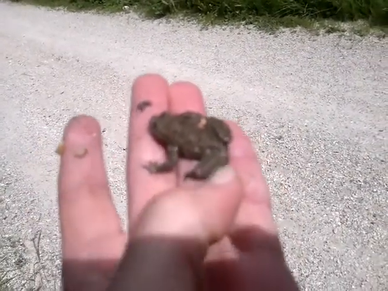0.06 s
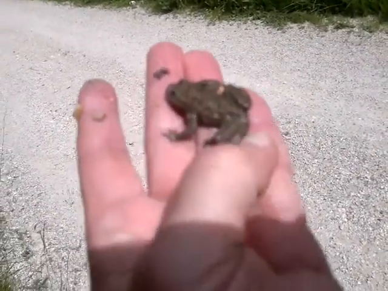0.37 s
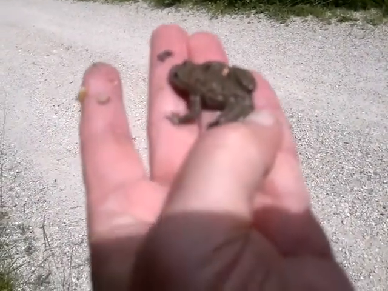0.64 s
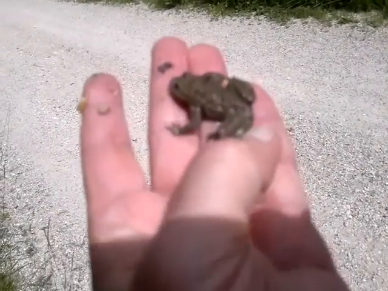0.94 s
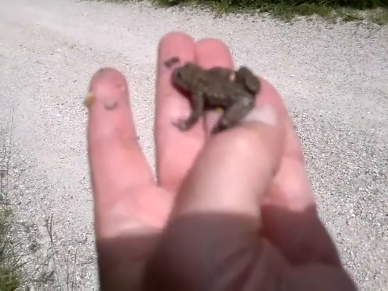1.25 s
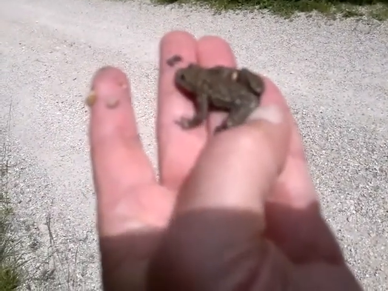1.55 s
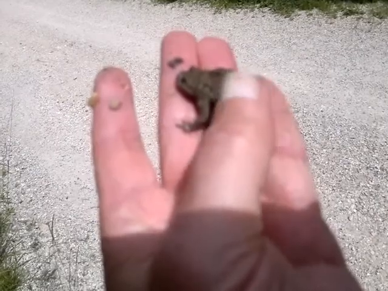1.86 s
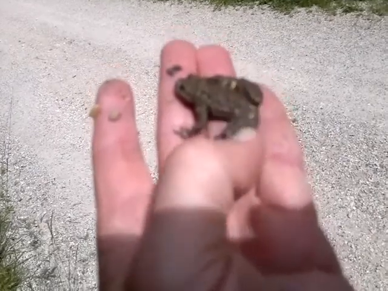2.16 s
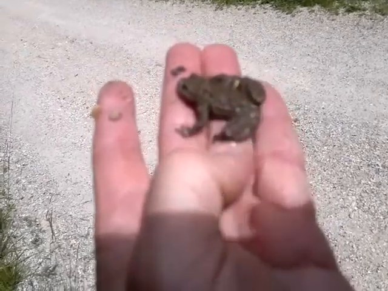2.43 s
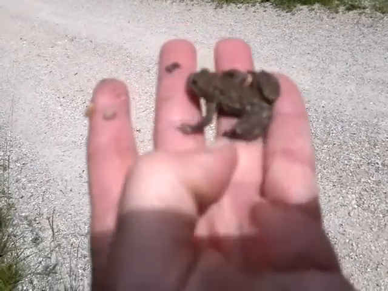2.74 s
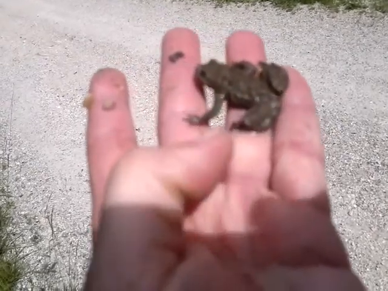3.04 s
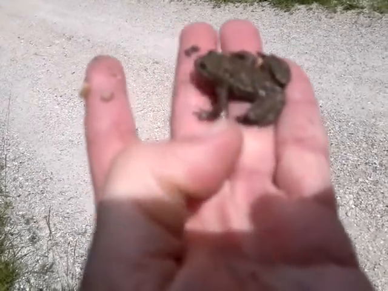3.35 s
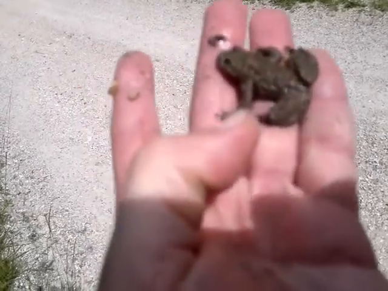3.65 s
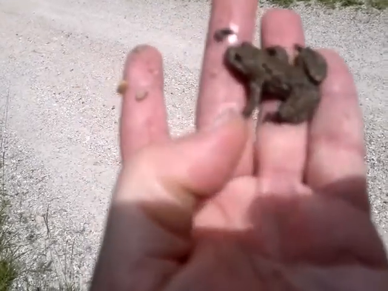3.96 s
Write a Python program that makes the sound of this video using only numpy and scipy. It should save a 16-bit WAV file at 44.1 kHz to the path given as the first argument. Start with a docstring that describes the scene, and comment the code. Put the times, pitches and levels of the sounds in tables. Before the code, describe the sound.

A grasshopper gives about ten faint, high, evenly spaced rasps that grow louder, then a farther one calls more slowly. Insects hiss steadily beside a country road, while wind rumbles and thumps on the microphone, mostly on the right.

```python
"""Grasshoppers by a summer gravel road

A grasshopper in the verge draws leg pegs across its wing: ten evenly spaced, growing calls, each a
short run of strokes. A farther one carries on more slowly over the steady hiss of other insects.
Gusts buffet the microphone, mostly its right port, over a soft far-off rush and a few hand scuffs."""
import sys
import numpy as np
from scipy import signal
from scipy.fft import rfft, irfft
from scipy.io import wavfile
from scipy.ndimage import uniform_filter1d

SR = 44100
rng = np.random.default_rng(int(sys.argv[2]) if len(sys.argv) > 2 else 0)


def wav_out(sig):
    """Save sig, one row per channel (or a flat mono array), as 16-bit PCM at SR to the path in sys.argv[1]."""
    wavfile.write(sys.argv[1], SR, np.round(np.clip(np.atleast_2d(sig).T, -1, 1) * 32767).astype(np.int16))


N = 176400
T = np.arange(N) / SR


def from_db(db):
    """Decibels to gain."""
    return 10 ** (np.asarray(db) / 20)


def unit_power(x):
    """Normalise to an RMS of one."""
    return x / np.sqrt(np.mean(x ** 2) + 1e-20)


def automation(points):
    """A breakpoint curve, read at every sample."""
    return np.interp(T, *np.transpose(points))


def swell(centre_s, width_s):
    """A bell-shaped fade in and out."""
    return np.exp(-.5 * ((T - centre_s) / width_s) ** 2)


def at_bins(points):
    """A curve over log frequency, read at every FFT bin."""
    hz, value = np.transpose(points)
    return np.interp(np.log(np.arange(N // 2 + 1) * SR / N + 1), np.log(hz), value)


def colour(x, eq):
    """Shape a sound with an EQ curve; unit power."""
    return unit_power(irfft(rfft(x) * from_db(at_bins(eq)), N))


def pan(db):
    """Stereo gains, with the left louder than the right by db."""
    return unit_power(from_db(np.array([[db], [-db]]) / 2))


def drift(rate_hz):
    """Smooth random modulation; unit power."""
    pole = np.exp(-2 * np.pi * rate_hz / SR)
    wander = signal.lfilter([1], [1, -2 * pole, pole * pole], rng.standard_normal(N + SR))
    return unit_power(wander[SR:])


def resonate(x, hz, width_hz):
    """One resonance applied twice, for steep skirts; unit power."""
    r = np.exp(-np.pi * width_hz / SR)
    section = [1 - r, 0, r - 1, 1, -2 * r * np.cos(2 * np.pi * hz / SR), r * r]
    return unit_power(signal.sosfilt([section, section], x + 1e-18))


# EQ of the far-off rush: f/Hz, gain/dB
AIR_EQ = [(20, 5.5), (50, 8), (100, 7.5), (150, 0), (280, 0.5), (420, -4), (560, -10), (700, -2.5),
          (850, -5), (1020, -8.5), (1250, -18), (1800, -20), (3000, -25), (5500, -27.5), (9000, -25.5),
          (15000, -39.5)]
# Its left-right likeness: f/Hz, correlation
AIR_CORRELATION = [(60, 0), (150, 0.64), (380, 0.85), (950, 0.56), (2000, 0), (15000, 0.085)]
AIR_PAN_DB = 1


def air():
    """The distant rush of open country: narrow in the mids, wide in the lows and highs."""
    mid, side = rfft(rng.standard_normal((2, N)))
    alike = at_bins(AIR_CORRELATION)
    noise = irfft(np.sqrt(1 + alike) * mid + np.sqrt(1 - alike) * side * [[1], [-1]], N)
    level = from_db(-59 + 1.5 * drift(rate_hz=4.15))
    return colour(noise, AIR_EQ) * level * pan(AIR_PAN_DB)


# Swells of the hum: t/s, level/dB
HUM_LEVEL = [(0, -66), (.6, -70), (.95, -68), (1.15, -64.5), (1.4, -68.5), (1.69, -63.5), (1.8, -70.5),
             (3.2, -68), (3.7, -66), (4, -74.5)]


def hum():
    """A soft, breathy mono hum within the rush, swelling now and then."""
    band = resonate(rng.standard_normal(N), hz=869, width_hz=320)
    return band * from_db(automation(HUM_LEVEL)) * pan(AIR_PAN_DB)


# EQ of the insect hiss: f/Hz, gain/dB
CHORUS_EQ = [(5500, -35), (6600, -13.5), (7200, -4), (7700, -2), (8300, -0.5), (8900, -2), (9600, -7),
             (10400, -5.5), (11300, -14), (13000, -22), (14500, -30), (16000, -46)]
# Fader ride of the insect bed: t/s, level/dB
CHORUS_LEVEL = [(0, -69.5), (.18, -72), (.4, -75.5), (.9, -72), (1.6, -71), (2.1, -69), (2.6, -66.5),
                (3.3, -66), (4, -66)]
# Wing tones that stand out: f/Hz, width/Hz, gain/dB
CHORUS_TONES = [(7730, 560, -13.5), (8050, 230, -12), (9300, 220, -12.5), (9940, 340, -19.5)]
CHORUS_PAN_DB = 7.5


def insect_chorus():
    """Insects along the verge merge into a fluttering high hiss, with a few wavering wing tones."""
    level = from_db(automation(CHORUS_LEVEL) + 1.3 * drift(rate_hz=45))
    bed = from_db(-2.5) * colour(rng.standard_normal((2, N)), CHORUS_EQ)
    for hz, width_hz, db in CHORUS_TONES:
        waver = from_db(db + 2.5 * drift(rate_hz=7.1))
        bed += waver * resonate(rng.standard_normal((2, N)), hz, width_hz)
    return bed * level * pan(CHORUS_PAN_DB)


# Fade-in of the shrill: t/s, level/dB
SHRILL_LEVEL = [(0, -84), (1.9, -85), (2.6, -78.5), (3.3, -73.5), (4, -73)]


def shrill_insect():
    """One more insect joins the chorus with a thin, high buzz."""
    buzz = resonate(rng.standard_normal((2, N)), hz=9700, width_hz=520)
    return buzz * from_db(automation(SHRILL_LEVEL)) * pan(CHORUS_PAN_DB)


# Handling cues: t/s, level/dB, width/s
SCUFFS = [(0.079, -55, 0.0047), (.38, -60, 0.0045), (1.829, -55.5, .024), (2.0, -62, .015),
          (2.728, -50, 0.0037), (3.744, -56, 0.011)]
# EQ of a rub on the casing: f/Hz, gain/dB
SCUFF_EQ = [(100, 5.5), (400, 7.5), (1200, -8), (3000, -19), (4500, -23), (10000, -29)]


def hand_scuffs():
    """Short dull rubs and ticks of a hand on the casing."""
    level = sum(from_db(db) * swell(s, width_s) for s, db, width_s in SCUFFS)
    return level * colour(rng.standard_normal((2, N)), SCUFF_EQ) * pan(db=-5)


# Wind pressure at the sheltered left port and the exposed right one, before trim: t/s, level/dB
LEFT_GUSTS = [(0, -33), (.08, -52), (.15, -37), (.25, -39.5), (.46, -43), (.55, -68), (1.0, -50),
              (1.17, -37.5), (1.3, -73), (1.7, -51), (1.98, -36), (2.1, -59), (2.45, -41), (2.71, -36.5),
              (2.82, -59), (3.52, -50.5), (3.66, -29), (3.76, -56), (3.85, -26), (4, -38)]
RIGHT_GUSTS = [(0, -18.5), (.06, -23.5), (.125, -51), (.195, -38), (.26, -54), (.29, -28), (.33, -25.5),
               (.36, -54), (.385, -27), (.485, -32.5), (.52, -62), (.62, -65), (.65, -37), (.69, -65),
               (1.3, -65), (1.345, -35), (1.39, -81), (1.73, -53.5), (1.79, -27), (1.805, -14),
               (1.845, -15), (1.915, -32.5), (2.005, -16), (2.035, -29.5), (2.08, -18), (2.155, -36.5),
               (2.185, -19), (2.22, -15.5), (2.29, -37.5), (2.36, -47), (2.398, -21.5), (2.426, -34),
               (2.456, -15.5), (2.505, -36), (2.542, -18), (2.6, -36), (2.628, -48), (2.65, -24),
               (2.7, -33), (2.742, -15.5), (2.81, -30.5), (2.845, -54), (2.94, -46.5), (3.0, -72),
               (3.44, -67), (3.54, -47.5), (3.57, -14.5), (3.635, -17), (3.685, -46), (3.712, -23.5),
               (3.744, -14), (3.79, -20), (3.828, -51.5), (3.893, -16), (3.945, -35.5), (4, -12)]
# EQs of the low buffeting and of the fine turbulence: f/Hz, gain/dB
BUFFET_EQ = [(12, -16), (22, -0.5), (35, 6.5), (55, 1), (80, -8.5), (120, -21.5), (170, -29), (250, -32),
             (400, -44), (700, -61.5), (1500, -68), (3000, -75), (8000, -100)]
FIZZ_EQ = [(150, -3), (600, 13), (1500, -14), (3000, -20), (8000, -31)]


def wind(gusts, trim_db):
    """Slow pressure lumps on one port, with a faint fizz of turbulence in the strong gusts."""
    force = uniform_filter1d(from_db(automation(gusts) + trim_db), size=300)
    rumble = colour(rng.standard_normal(N), BUFFET_EQ)
    window = int(0.045 * SR)
    power = uniform_filter1d(uniform_filter1d(rumble ** 2, window), window // 2)
    lumps = rumble / np.sqrt(power + 1e-6)   # levelled, so the gust alone sets the dynamics
    fizz = from_db(-43.5) * colour(rng.standard_normal(N), FIZZ_EQ)
    return force * lumps + force ** 1.3 * fizz


# Hits of the hardest gusts: t/s, envelope peak/dB, f/Hz
SLAPS = [(1.797, -18, 70), (1.832, -13.5, 65.4), (1.993, -15.5, 66.6), (2.449, -19, 63.4), (2.721, -23, 96),
         (3.574, -10.5, 97), (3.611, -14.5, 106.5), (3.738, -10, 73)]


def wind_slaps():
    """A hard gust slaps the port: a low thump that dies within a cycle or two."""
    attack_cycles = 0.49
    thumps = np.zeros(N)
    for s, db, hz in SLAPS:
        cycles = np.maximum(T - s, 0) * hz
        age = cycles / attack_cycles
        envelope = np.square(age * np.exp(1 - age))
        thumps += from_db(db) * envelope * np.sin(2 * np.pi * cycles)
    return thumps


def peg_clicks(per_s=4000, spread_db=1.5):
    """Leg pegs catch on the wing: dense, uneven clicks, of random polarity in each channel."""
    hits = rng.random(N) < per_s / SR
    sizes = from_db(spread_db * rng.standard_normal(N))
    return hits * sizes * rng.choice([-1, 1], (2, N))


def grass_scatter(x, wet_db=-5.5, t60_s=0.2):
    """Grass and ground add a short diffuse tail."""
    t = T[:SR // 2]
    tail = rng.standard_normal((2, len(t))) * from_db(-60 * t / t60_s)
    wet = signal.fftconvolve(x, unit_power(tail) / np.sqrt(len(t)), axes=1)[:, :N]
    return x + from_db(wet_db) * wet


# Cues of the far calls: t/s, level/dB
FAR_CALLS = [(2.37, -72), (2.55, -69), (2.745, -71), (2.93, -67.5), (3.15, -68.5), (3.385, -66),
             (3.625, -67), (3.99, -68)]
# EQ of the rasp, duller with distance: f/Hz, gain/dB
FAR_RASP_EQ = [(5500, -30), (7000, -12), (8000, 1), (10000, 2), (12000, -0.5), (13500, -8), (14500, -7),
               (16000, -22)]


def far_grasshopper():
    """Slower, softer calls, their strokes blurred by distance: the wing tone leads, the rasp follows."""
    def calls(lag_s):
        return sum(from_db(db) * swell(s + lag_s, width_s=0.021) for s, db in FAR_CALLS)

    pegs = peg_clicks()
    wing = resonate(pegs, hz=7500, width_hz=1400) * calls(lag_s=-0.017)
    rasp = colour(pegs, FAR_RASP_EQ) * calls(lag_s=0.014)
    return grass_scatter(wing + from_db(-3) * rasp) * pan(db=8)


# Last and strongest stroke of each near call: t/s, level/dB
NEAR_CALLS = [(.487, -72), (.665, -63.5), (0.828, -63.5), (.994, -62), (1.147, -61.5), (1.31, -62),
              (1.472, -60.5), (1.634, -59.5), (1.795, -59.5), (1.997, -59)]


def leg_strokes(count, build_db, gap_s=.0172, stroke_s=.0115):
    """Envelope of the near calls: each stroke tops the one before, over light rubbing of the leg."""
    power = np.zeros(N)
    for s, db in NEAR_CALLS:
        rub = from_db(db - 14) * swell(s, width_s=0.037)
        power += rub ** 2
        for k in range(count):   # counting back from the strongest stroke
            centre = s - k * gap_s * rng.normal(1, 0.036)
            soft_gate = 1 / (1 + (2 * (T - centre) / stroke_s) ** 6)
            power += np.square(from_db(db - k * build_db) * soft_gate)
    return np.sqrt(power)


# EQ of the wing's bright, close rasp: f/Hz, gain/dB
NEAR_RASP_EQ = [(5000, -37), (6800, -32), (7800, 7.5), (8600, 8), (9500, -0.5), (10500, 0.5), (11100, 3.5),
                (11600, 7), (12100, -8), (12700, -1.5), (13600, -10), (14000, -3), (14400, -3),
                (14800, -13), (15300, -18), (16000, -34)]


def near_grasshopper():
    """Four strokes of the pegs a call excite a bright rasp; the hardest two also ring the wing."""
    pegs = peg_clicks()
    rasp = colour(pegs, NEAR_RASP_EQ) * leg_strokes(count=4, build_db=7)
    wing = resonate(pegs, hz=7560, width_hz=810) * leg_strokes(count=2, build_db=3.5)
    return grass_scatter(rasp + from_db(-3) * wing) * pan(db=6.5)


def scene():
    """The mix: insects to the left, wind and handling to the right, distant air behind."""
    left_port = wind(LEFT_GUSTS, trim_db=-8)
    right_port = wind(RIGHT_GUSTS, trim_db=-1) + wind_slaps()
    insects = near_grasshopper() + far_grasshopper() + insect_chorus() + shrill_insect()
    return insects + air() + hum() + np.array([left_port, right_port]) + hand_scuffs()


def record(dry):
    """A steep high cut on the whole mix."""
    stopband_hz = 15900
    return signal.sosfilt(signal.cheby2(16, 60, stopband_hz, fs=SR, output="sos"), dry)


dry = scene()
out = record(dry)
wav_out(out)
```